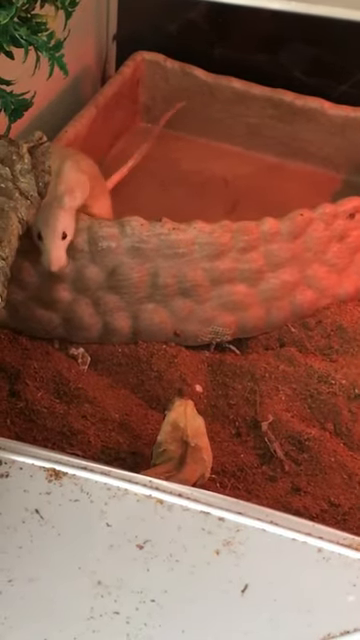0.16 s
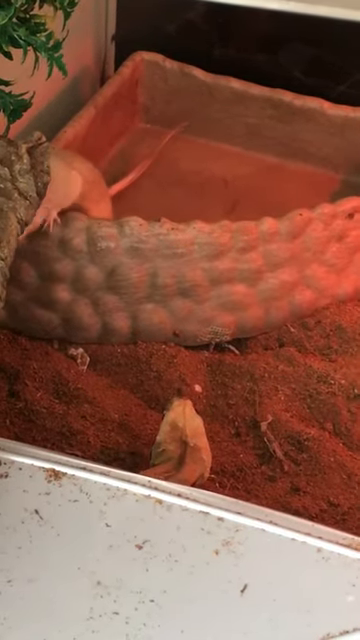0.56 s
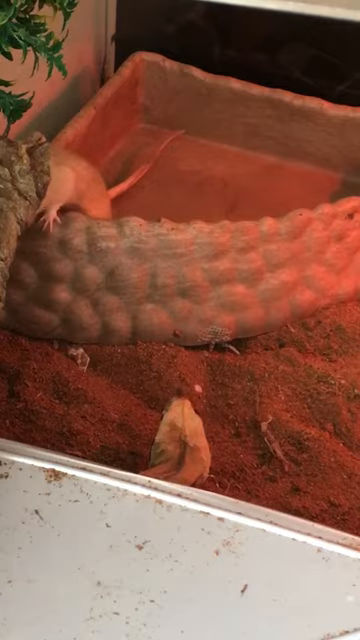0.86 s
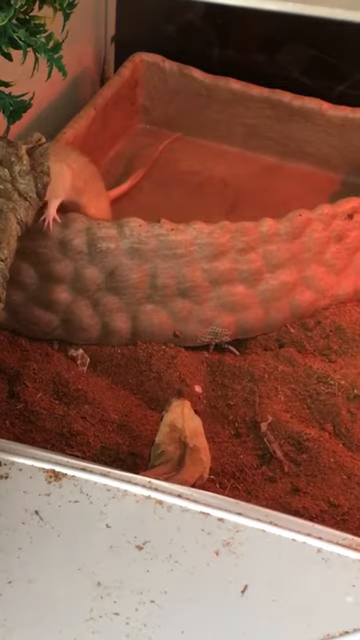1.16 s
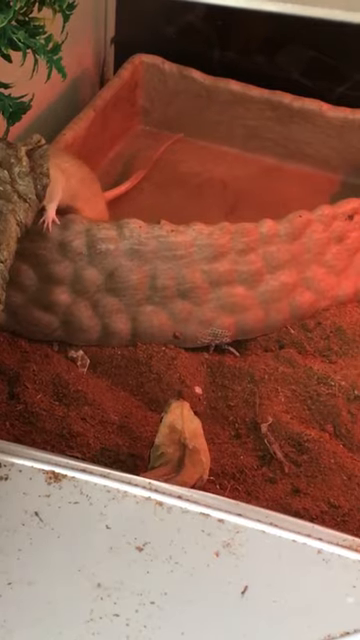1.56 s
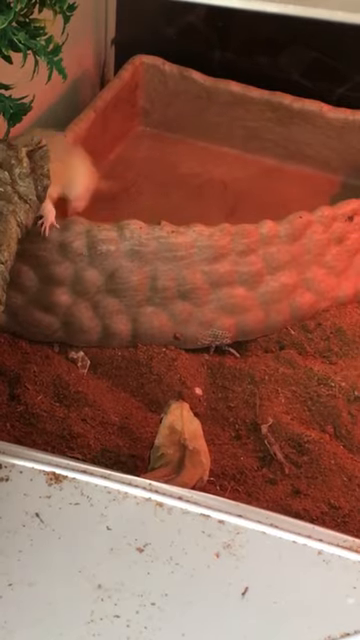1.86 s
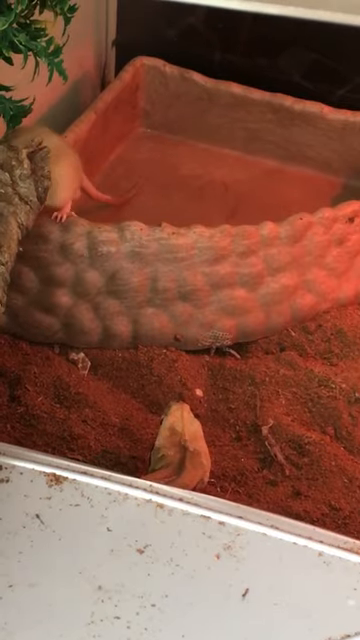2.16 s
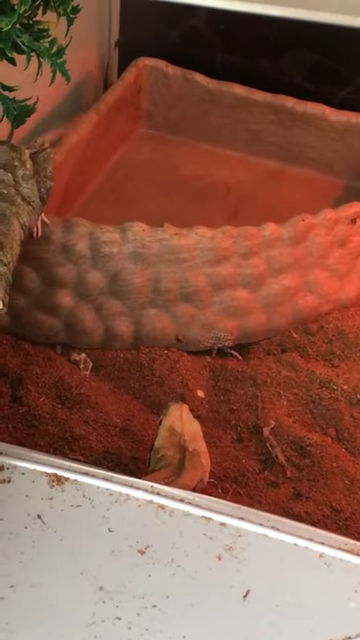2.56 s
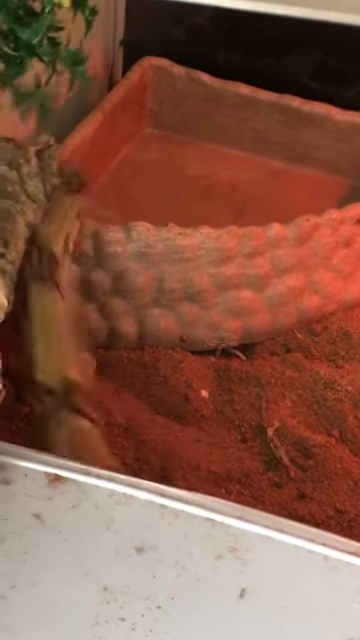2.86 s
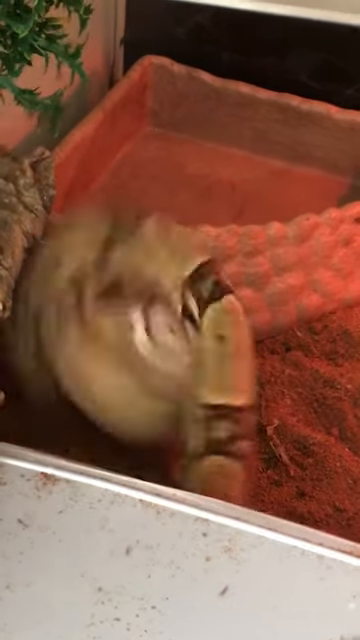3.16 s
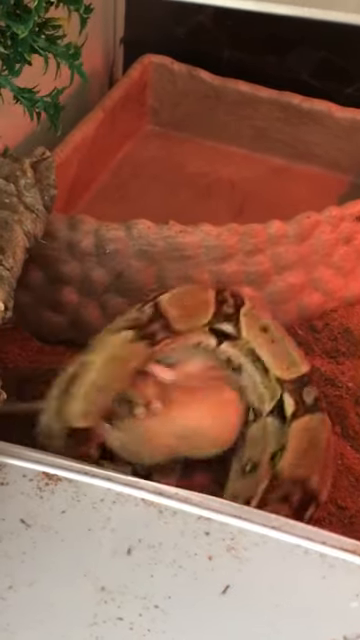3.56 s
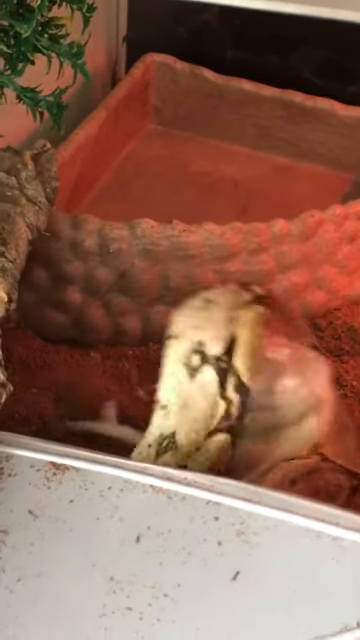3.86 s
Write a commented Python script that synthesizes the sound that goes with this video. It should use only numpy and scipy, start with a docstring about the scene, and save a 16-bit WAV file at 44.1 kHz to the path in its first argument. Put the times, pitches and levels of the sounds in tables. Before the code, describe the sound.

Two long, harsh hissing cries come from a struggle between a snake and a rat. Before them, a low ventilation hum runs alone until the strike lands with a hollow thump and scattering grit, close by in a small enclosure.

```python
"""A ventilation hum is heard first and runs on underneath; loose bedding crunches faintly.
A snake strikes a rat in a small glass-fronted enclosure and drags it down onto the bedding.
The blow and the tumbling bodies excite the modes of the hollow floor, and grit scatters in clicks.
Two long, harsh hissing cries follow: turbulent air, forced through a narrow throat and shaped by
its resonances. Reflections from the close walls add a short ring to the grit and the cries."""
import sys
import numpy as np
from scipy import signal
from scipy.fft import rfft, irfft
from scipy.io import wavfile
from scipy.ndimage import uniform_filter1d

SR = 44100
rng = np.random.default_rng(int(sys.argv[2]) if len(sys.argv) > 2 else 0)


def unload_wav(signal):
    """Save mono or channel-first audio to the path in sys.argv[1] as 16-bit WAV at rate SR, clipped to [-1, 1]."""
    wavfile.write(
        sys.argv[1],
        SR,
        np.round(np.clip(np.atleast_2d(signal).T, -1, 1) * 32767).astype(np.int16),
    )


N = 176400
T = np.arange(N) / SR
FREQUENCIES = np.arange(N // 2 + 1) * SR / N
CUTOFF_HZ = 15700


def from_db(db):
    """Amplitude ratio of a level in decibels."""
    return 10 ** (np.asarray(db) / 20)


def unit_rms(x):
    """Normalisation to unit power."""
    return x / np.sqrt(np.mean(x ** 2) + 1e-20)


def in_time(rows):
    """Linear interpolation of a curve's columns at every sample."""
    times, *columns = np.transpose(rows)
    return [np.interp(T, times, column) for column in columns]


def gate(rows):
    """Time window: one while a curve lasts, with short fades."""
    return uniform_filter1d(((T > rows[0][0]) & (T < rows[-1][0])) * 1., size=128)


def coloured(spectrum, source=None):
    """Spectral shaping of white noise or a given source, to unit rms."""
    source = rng.standard_normal(N) if source is None else source
    hz, db = np.transpose(spectrum)
    bins = np.maximum(FREQUENCIES, 1)
    gain = from_db(np.interp(np.log(bins), np.log(hz), db))
    roll_off = (np.minimum(bins / hz[0], 1) * np.minimum(hz[-1] / bins, 1)) ** 2
    return unit_rms(irfft(rfft(source) * gain * roll_off, N))


def drift(corner_hz):
    """Random modulation: low-pass noise of unit rms."""
    coarse = T[::10]
    white = rfft(rng.standard_normal(len(coarse)))
    smooth = irfft(white / (1 + (FREQUENCIES[:len(white)] / corner_hz) ** 2), len(coarse))
    return np.interp(T, coarse, unit_rms(smooth))


def grains(per_s=9000, spread_db=2.5):
    """Shot noise: dense random clicks of uneven size."""
    sizes = from_db(spread_db * np.minimum(rng.exponential(1, N), 4))
    signs = rng.choice([-1, 1], N)
    return sizes * signs * (rng.random(N) < per_s / SR)


# Air noise: f/Hz, relative spectral level/dB
AIR_SPECTRUM = [(20, -14), (38, 11.5), (50, 5.5), (100, 10), (130, 2), (220, 5), (260, -3.5), (370, 2.5),
                (520, -5), (1050, -2.5), (2100, -7), (2700, -12.5), (4000, -14), (4900, -19.5), (6100, -18),
                (7700, -23), (9300, -22), (10500, -27), (15800, -30.5)]
# Hum partials: f/Hz, level/dB, linewidth/Hz
HUM_PARTIALS = [(47.5, -56, 0.79), (55.1, -43, 1), (78.5, -51.5, 8.2), (99, -50.5, 2.7), (160.4, -56, 1.6),
                (172.5, -55, 1.04), (217.5, -52.5, 6.8), (363.6, -57, 4.7), (626.4, -58, 21)]


def ventilation(air_db=-42, waver_db=3.5, waver_hz=4):
    """Broadband air noise plus a hum whose lines are broadened by random modulation."""
    out = from_db(air_db) * coloured(AIR_SPECTRUM)
    for hz, db, width_hz in HUM_PARTIALS:
        phase = 2 * np.pi * np.cumsum(hz + width_hz / 2 * drift(waver_hz)) / SR
        waver = from_db(waver_db * drift(waver_hz))
        out += from_db(db) * unit_rms(np.sin(phase) * waver)
    return out


# Envelope of the dragging: t/s, level/dB
DRAG_LEVEL = [(2.72, -28.5), (2.745, -23), (2.79, -20.5), (2.83, -25.5), (2.9, -26.5), (2.99, -43),
              (3.025, -36), (3.045, -23), (3.08, -35), (3.125, -26), (3.19, -46.5), (3.25, -69)]
# Its rumble: f/Hz, relative spectral level/dB
DRAG_SPECTRUM = [(35, -24), (70, -2), (115, 6), (180, -5), (280, -3.5), (420, -15.5), (800, -23.5),
                 (2000, -28), (6000, -46)]


def drag():
    """Friction noise: the snake's coils rumble over the bedding."""
    db, = in_time(DRAG_LEVEL)
    return from_db(db) * gate(DRAG_LEVEL) * coloured(DRAG_SPECTRUM, grains())


# Contacts with the bedding: t/s, level/dB, decay time constant/s
CRUNCHES = [(1.773, -51, .02), (1.854, -46.5, .004), (2.17, -58, .04), (2.683, -36.5, 0.02),
            (2.7381, -15, 0.0068), (2.779, -27, 0.011), (3.4146, -49, .008)]
# Scattering grit: f/Hz, relative spectral level/dB
GRIT_SPECTRUM = [(300, 11), (700, -15), (1100, 0.5), (1600, -4.5), (3000, -2.5), (5700, 3), (8500, -5),
                 (15500, -11)]


def crunches(rise_s=0.0031):
    """Granular impacts: each contact throws up a spray of grit that grows and decays exponentially."""
    envelope = np.zeros(N)
    for peak_s, db, decay_s in CRUNCHES:
        age = T - peak_s
        envelope += from_db(db) * np.exp(np.where(age < 0, age / rise_s, -age / decay_s))
    return envelope * coloured(GRIT_SPECTRUM, grains())


# Bodies hitting the floor: t/s, level/dB, corner f/Hz of the contact, time stretch (ratio)
BLOWS = [(2.735, 0, 1400, 1), (2.86, -14.5, 130, 0.59), (2.937, -24, 100, 1), (3.034, -34, 700, .8),
         (3.092, -10.5, 158, 0.78), (3.157, -27, 55, 1)]
# Modes of the hollow floor: f/Hz, relative level/dB, swell time before stretching/s
FLOOR_MODES = [(80.4, -18, 0.022), (131.6, 0, .024), (208, -1.5, 0.0086), (275, -14.5, 0.014),
               (370, -29, 0.0088), (460, -25, 0.01), (597, -25.5, .011), (1167, -23, 0.0059)]


def thumps():
    """Modal excitation: soft blows swell and die in the floor; duller ones reach only its low modes."""
    out, age = np.zeros(N), T[:SR // 3]
    hz, mode_db, swell_s = np.transpose(FLOOR_MODES)[:, :, None]
    for onset_s, db, corner_hz, stretch in BLOWS:
        gains = from_db(mode_db) / np.hypot(1, (hz / corner_hz) ** 3)
        progress = age / (swell_s * stretch)
        envelopes = (progress * np.exp(1 - progress)) ** 3
        modes = gains * envelopes * np.sin(2 * np.pi * hz * age)
        start = int(onset_s * SR)
        out[start:start + len(age)] += from_db(db) * modes.sum(axis=0) / np.linalg.norm(gains)
    return out


def enclosure(x, first_echo_s=0.0011, t60_s=0.048, echo_db=-4.5):
    """Reverberation: dense reflections from close walls add a short ring."""
    t = T[:SR // 4]
    echoes = rng.standard_normal(len(t)) * from_db(-60 * t / t60_s) * (t > first_echo_s)
    ring = signal.fftconvolve(x, echoes / np.linalg.norm(echoes))[:N]
    wet = from_db(echo_db)
    return (x + wet * ring) / np.hypot(1, wet)


def resonance(hz, width_hz, wobble_share=.016, flicker_db=0.84):
    """Noise-driven resonance: a steep band whose centre wobbles and whose level flickers."""
    phase = 2 * np.pi * np.cumsum(hz * (1 + wobble_share * drift(corner_hz=35))) / SR
    low_pass = signal.butter(3, width_hz / 2, fs=SR, output="sos")
    in_phase, quadrature = signal.sosfilt(low_pass, rng.standard_normal((2, N)))
    band = in_phase * np.cos(phase) + quadrature * np.sin(phase)
    return unit_rms(band * from_db(flicker_db * drift(corner_hz=32)))


def turbulence(x, depth_db=2.5, corner_hz=18):
    """Turbulence makes neighbouring bands swell and fade independently; total power is conserved."""
    spectrum, out = rfft(x), np.zeros(N)
    centres = np.linspace(0, CUTOFF_HZ, 26)
    for weights in np.eye(len(centres)):
        band = irfft(spectrum * np.interp(FREQUENCIES, centres, weights), N)
        out += band * from_db(depth_db * drift(corner_hz))
    return unit_rms(out) * np.std(x)


# Course of each cry: t/s, level/dB, main resonance f/Hz, relative treble/dB, relative rasp/dB
FIRST_THROAT = [(2.785, -50, 3950, -9, -14), (2.812, -34, 3900, -3, -14), (2.872, -24, 3750, -10, -24),
                (2.91, -29, 3824, -11, -20), (2.948, -20.5, 3920, -4.5, -18.5),
                (3.018, -21.5, 4030, -12, -19.5), (3.029, -13, 4120, -3, -29), (3.07, -16, 4020, -6, -27.5),
                (3.12, -18.5, 3758, -12, -20), (3.155, -22, 3800, -10, -15),
                (3.21, -27.5, 3374, -10, -10.5), (3.256, -27.5, 3315, -9, -13), (3.27, -54, 3840, -16, -28),
                (3.31, -54.5, 3970, -14, -16)]
SECOND_THROAT = [(3.449, -57, 4110, -10, -24), (3.456, -20, 4120, -13, -19), (3.482, -15, 3994, -13, -20.5),
                 (3.496, -18, 3987, -5.5, -19), (3.526, -15, 4096, -10, -22),
                 (3.576, -17.5, 4556, -10, -16), (3.615, -20, 4217, -1, -19), (3.68, -22.5, 4200, 0.5, -14),
                 (3.696, -25.5, 4225, 1, -14), (3.785, -25, 4360, -8, -11), (3.825, -31, 3770, -2, -2),
                 (3.905, -25, 3357, -14, -10), (3.92, -41, 3280, -20, -18), (3.96, -55, 3340, -18, -12)]
# Three upper resonances, sinking as the mouth closes; for each: t/s, f/Hz, relative level/dB
FIRST_UPPER = [
    [(2.81, 4800, -12), (2.87, 6400, -7.5), (2.95, 5700, -11), (3.0, 5900, 1.5), (3.04, 5700, -8),
     (3.1, 6300, -6), (3.16, 6000, 2.5), (3.21, 5100, 7.5), (3.26, 5200, 10)],
    [(2.81, 9500, -1), (2.87, 8900, -3), (2.95, 8600, -7), (3.11, 8600, -13), (3.16, 8900, 4.5),
     (3.2, 8500, -2), (3.26, 7300, -6.5)],
    [(2.81, 12000, -17), (2.87, 11700, -0.5), (2.94, 11920, -13), (3.02, 11700, -13), (3.08, 11740, -8),
     (3.15, 11000, -16), (3.24, 10300, -9)],
]
SECOND_UPPER = [
    [(3.45, 5400, -6.5), (3.51, 5350, -7.5), (3.55, 5038, 0), (3.62, 5900, -14), (3.7, 5380, -6),
     (3.83, 5420, 6), (3.91, 5540, -12)],
    [(3.46, 8730, -9), (3.51, 8670, -5), (3.56, 8770, -3), (3.67, 8500, -2.5), (3.76, 7640, -5),
     (3.82, 6370, -16), (3.91, 6440, -28)],
    [(3.53, 12900, -11), (3.6, 12500, -4), (3.7, 12400, -14), (3.8, 12400, -6), (3.91, 12140, -16)],
]
# For each upper resonance: bandwidth/Hz
UPPER_WIDTHS = [2500, 2000, 2200]
# Air noise around the resonances, low rasp and treble: f/Hz, relative spectral level/dB
FIRST_RASP = [(300, -28), (700, -32), (1300, -27), (1520, -6.5), (1830, 4.5), (2100, -3), (2480, 5),
              (2780, -11), (3150, 1.5), (3900, -13)]
SECOND_RASP = [(300, -25), (650, -18), (1000, -6.5), (1320, -4), (1530, -9), (1850, -0.5), (2400, -0.5),
               (2780, -8), (3150, 5), (3900, -9)]
TREBLE_SPECTRUM = [(3000, -32), (4300, 8), (7000, 0), (9400, -1), (10400, -2.5), (12000, 2), (14000, -7),
                   (15800, -4.5)]


def hiss(throat, upper, rasp):
    """Source and filter: sputtering air is forced through a narrow throat with four moving resonances."""
    db, main_hz, treble_db, rasp_db = in_time(throat)
    air = from_db(-0.5) * resonance(main_hz, width_hz=770)
    air += from_db(treble_db + 2) * coloured(TREBLE_SPECTRUM)
    air += from_db(rasp_db + 2.5) * coloured(rasp)
    for curve, width_hz in zip(upper, UPPER_WIDTHS):
        hz, upper_db = in_time(curve)
        air += from_db(upper_db - 1.5) * resonance(hz, width_hz)
    cry = turbulence(air) * gate(throat)
    flutter_db = 0.53 * drift(corner_hz=110)
    sputter_db = 1.5 * drift(corner_hz=410)
    return cry * from_db(db + flutter_db + sputter_db)


def scene():
    """Superposition of the hum and the struggle in the enclosure, in one channel."""
    first_cry = hiss(FIRST_THROAT, FIRST_UPPER, FIRST_RASP)
    second_cry = hiss(SECOND_THROAT, SECOND_UPPER, SECOND_RASP)
    reverberant = enclosure(crunches() + first_cry + second_cry)
    return (reverberant + thumps() + drag() + ventilation())[None]


def record(dry, ceiling=.93):
    """Soft saturation rounds the highest peaks; a steep low-pass filter cuts the top."""
    rounded = dry / (1 + (dry / ceiling) ** 8) ** (1 / 8)
    return signal.sosfilt(signal.ellip(12, .1, 80, CUTOFF_HZ, fs=SR, output="sos"), rounded)


dry = scene()
out = record(dry)
unload_wav(out)
```